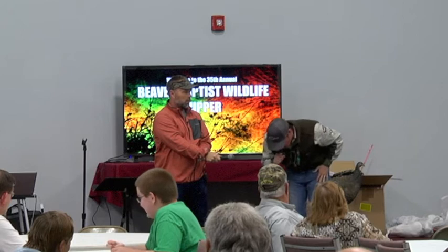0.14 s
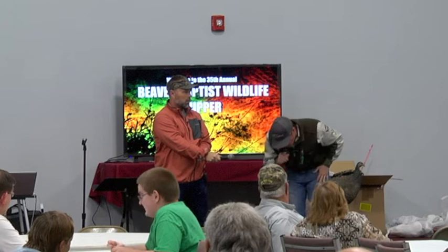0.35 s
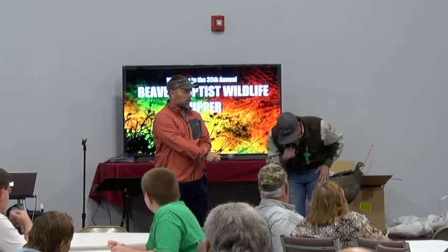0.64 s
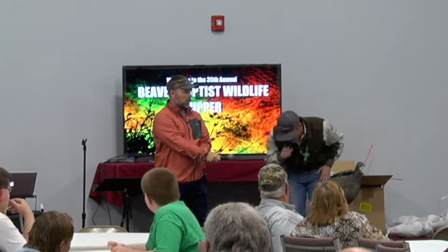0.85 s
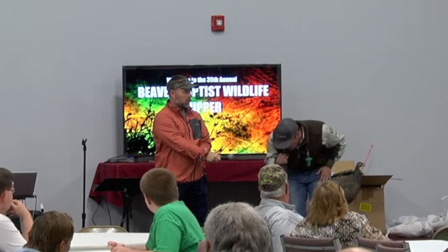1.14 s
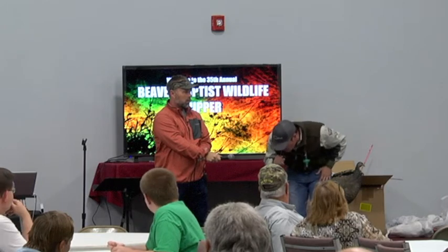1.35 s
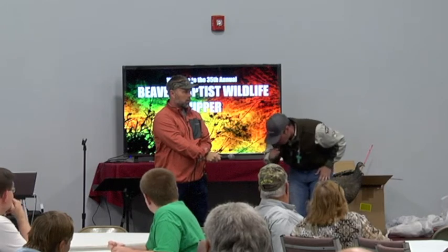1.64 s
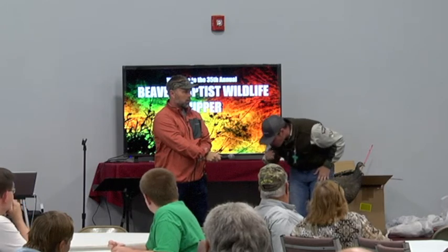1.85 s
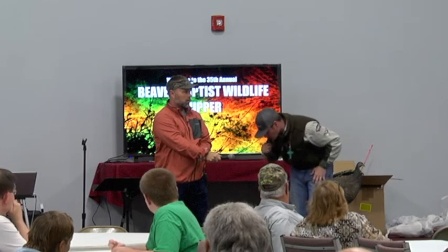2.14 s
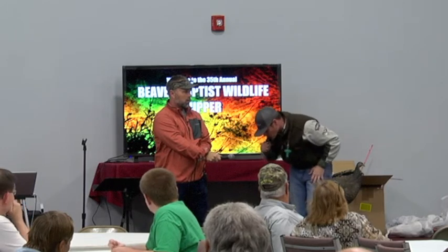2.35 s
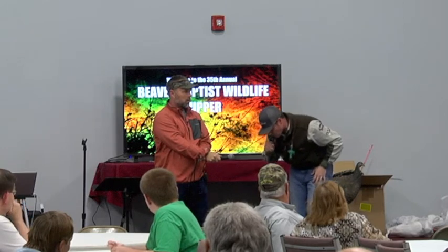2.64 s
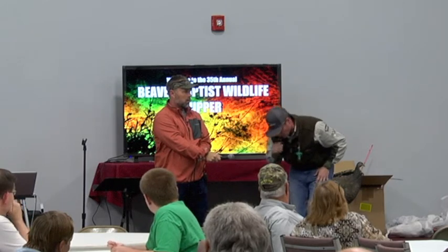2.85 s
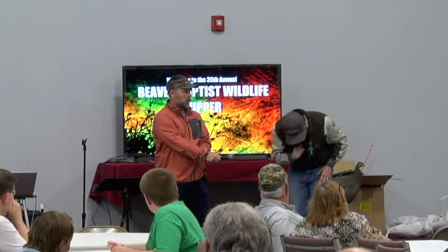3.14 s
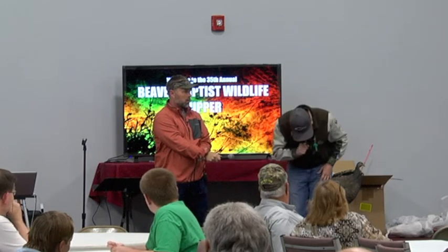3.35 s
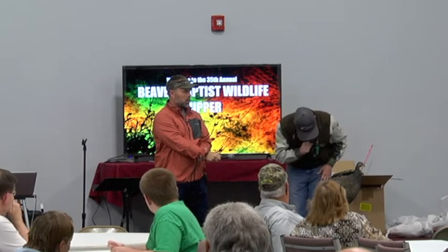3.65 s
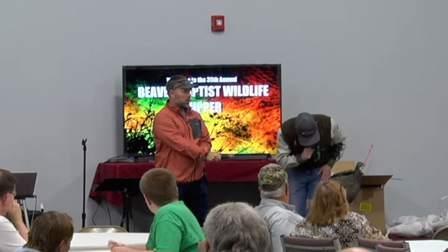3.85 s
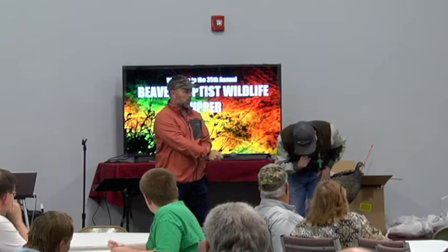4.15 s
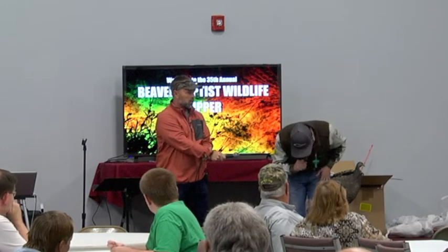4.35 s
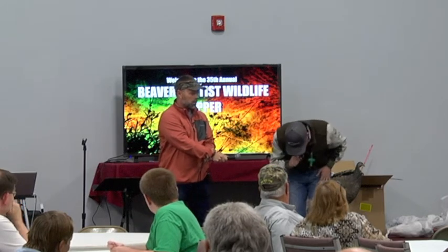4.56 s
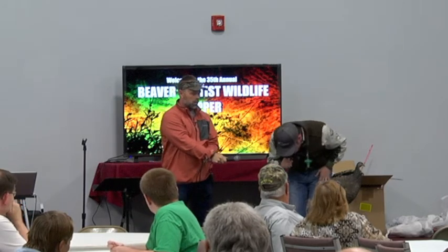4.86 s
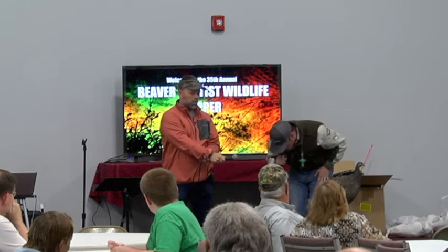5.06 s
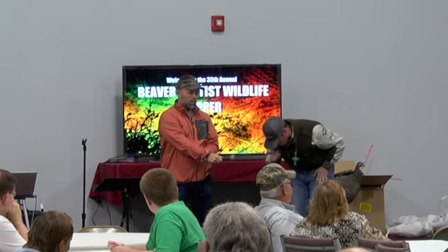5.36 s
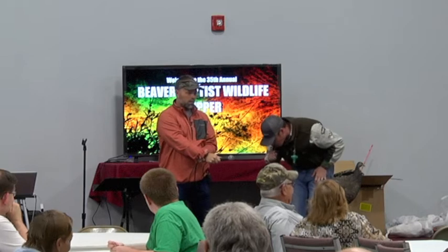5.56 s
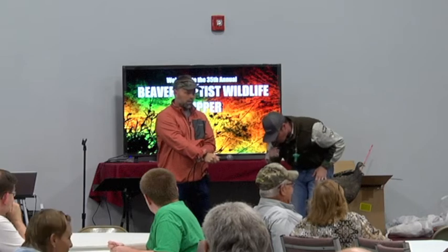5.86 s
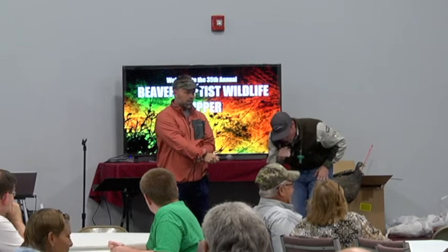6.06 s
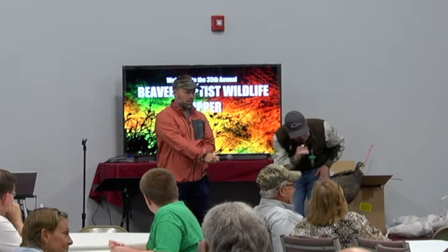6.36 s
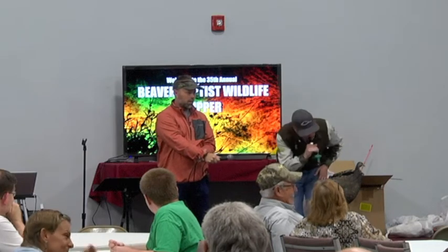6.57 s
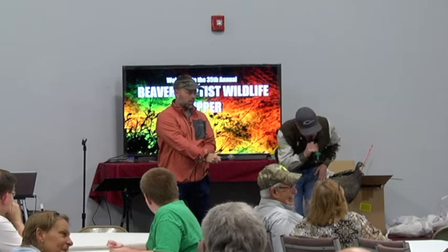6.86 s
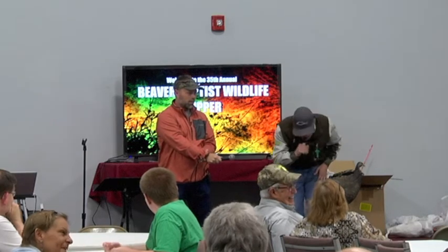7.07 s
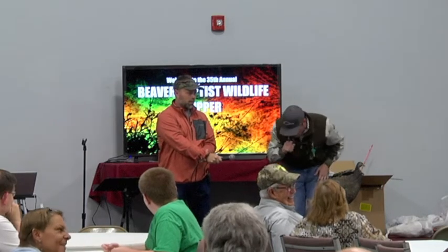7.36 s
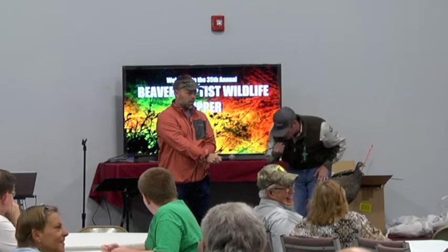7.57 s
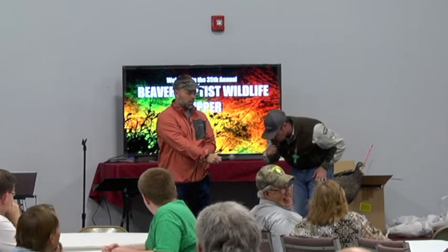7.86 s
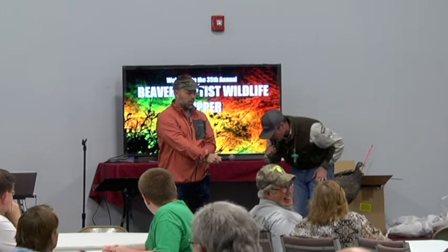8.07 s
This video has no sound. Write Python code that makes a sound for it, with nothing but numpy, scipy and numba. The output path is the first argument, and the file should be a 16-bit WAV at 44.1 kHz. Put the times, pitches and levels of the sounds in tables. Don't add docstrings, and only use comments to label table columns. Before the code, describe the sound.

A hand-held duck call blown close to a microphone in a hard, echoing hall: long raspy honks, then faster, louder honks alternating with short clucks.

```python
import sys
import numpy as np
from scipy import signal
from scipy.fft import rfft, irfft
from scipy.io import wavfile
from scipy.ndimage import uniform_filter1d
from numba import njit

SR = 44100
rng = np.random.default_rng(int(sys.argv[2]) if len(sys.argv) > 2 else 0)


def ratio_of_db(decibels):
    return 10 ** (np.asarray(decibels, float) / 20)


def store_wav(level_fs):
    pcm = np.round(np.clip(np.atleast_2d(level_fs), -1, 1) * 32767)
    wavfile.write(sys.argv[1], SR, pcm.T.astype(np.int16))


N = 361619


def rms_one(x):
    return x / np.sqrt(np.mean(x ** 2) + 1e-20)


def at_hz(points, hz, column=1):
    points = np.array(points)
    return np.interp(np.log(hz), np.log(points[:, 0]), points[:, column])


def resonance(x, hz, width_hz):
    r = np.exp(-np.pi * width_hz / SR)
    return signal.lfilter([(1 - r * r) / 2, 0, (r * r - 1) / 2], [1, -2 * r * np.cos(2 * np.pi * hz / SR), r * r], x)


@njit
def moving_resonance(x, cosine, r):
    y = np.zeros(len(x))
    for i in range(2, len(x)):
        drive = (1 - 2 * r * cosine[i] + r * r) * x[i]
        y[i] = drive + 2 * r * cosine[i] * y[i - 1] - r * r * y[i - 2]
    return y


def drift(hz):
    return rms_one(resonance(resonance(rng.standard_normal(N), hz, hz), hz, hz))


def blowing(attack_s=0.007, release_s=0.011, opening_s=0.02, closed=0.69, closing=0.1):
    # start in seconds, length in seconds, slaps per second at the start in Hz, held in Hz, at the end in Hz.
    honks = [(-0.1, 0.252, 420, 467.2, 442.3), (0.271, 0.212, 383.5, 451.3, 409.4),
             (0.607, 0.165, 384.9, 452.1, 385), (1.122, 0.493, 391.1, 469.3, 422.4),
             (1.779, 0.308, 347.3, 467.7, 403.8), (2.21, 0.246, 387.1, 446, 407),
             (2.591, 0.236, 378.8, 448, 403.4), (2.932, 0.136, 395, 449.4, 442.4),
             (3.175, 0.379, 328.8, 456, 410.9), (3.706, 0.298, 289.1, 412.8, 365.2),
             (4.125, 0.142, 388.1, 400.9, 431.6), (4.354, 0.236, 448.5, 621.2, 591.3),
             (4.748, 0.274, 470.4, 583.8, 515.6), (5.152, 0.254, 423.6, 587.9, 487),
             (5.536, 0.232, 415.9, 482.8, 416.6), (5.879, 0.14, 489.5, 487, 413.1),
             (6.108, 0.164, 418.5, 500, 596.6), (6.462, 0.142, 529.6, 473.5, 561.3),
             (6.803, 0.12, 598.1, 482.9, 530.3), (7.099, 0.12, 498.3, 478.6, 528.3),
             (7.407, 0.106, 449.2, 427.6, 494.7), (7.676, 0.076, 439.7, 407.6, 412.6),
             (7.898, 0.074, 367, 441.2, 425)]
    # level in dB, cupped-hand resonance in Hz, lowest partial in dB over the level,
    # unevenness of slap pairs (0-1), rasp (0-1).
    blows = [(-11.5, 1800, -21, .45, 1), (-11.5, 1830, -17.5, 0.7, 0.8), (-12.5, 1830, -17.5, .8, 0.1),
             (-11, 1828, -17.5, 0.5, 0.6), (-10.5, 1864, -14, .4, 1), (-11, 1854, -10.5, 0.38, 1),
             (-11.5, 1804, -11.5, 0.7, .8), (-12.5, 1806, -15, 0.33, 1.01), (-12, 1488, -15, 0.7, 0.3),
             (-11.5, 1518, -13, .6, 1), (-13, 1614, -12, 0.4, 0.5), (-9.5, 1983, -37.5, .05, 1),
             (-9.5, 1890, -34.5, .1, .05), (-10, 1780, -19, 0, 0.2), (-10, 1790, -12, .2, 0.96),
             (-10, 1740, -12, 0.4, 1), (-8, 1764, -15.5, .25, 1), (-7, 1880, -20, 0.2, 1.01),
             (-7, 1920, -20, .05, 0.5), (-7.5, 1980, -17.5, 0.22, 0.7), (-5, 1755, -19, 0.19, 0.2),
             (-9, 1880, -10.5, 0.2, 1.01), (-9, 1980, -12.5, 0.7, 1)]
    glides = [(.17, 0.0828), (.12, 0.22), (.12, .2), (.17, .1), (.15, .07), (.17, .1), (.2, .12),
              (0.19, 0.1058), (.14, .07), (.3, .12), (.1, 0.0797), (.2, 0.0503), (.13, .1), (.26, .1),
              (0.16, 0.082), (0.033, .25), (.25, .06), (0.17, .12), (.15, 0.12), (0.15, .12), (.17, .15),
              (.25, 0.078), (0.1, 0.3)]
    # start in seconds, length in seconds, held pitch in Hz, level in dB, lowest partial in dB over the level.
    clucks = [
        (4.604, 0.01, 720, -17.5, -18.5),
        (6.327, 0.032, 798.7, -10.5, -19),
        (6.67, 0.026, 935, -13.5, -13),
        (6.979, 0.032, 991.3, -14.5, -8),
        (7.289, 0.03, 938.5, -9, -25.5),
        (7.58, 0.026, 755.5, -10.5, -11.5),
        (7.804, 0.048, 691, -14.5, -3.5),
    ]
    droops = [.9, 1, 0.98, 0.92, 0.93, 0.96, .83]
    # centre in seconds, half length in seconds, pitch ratio.
    squeals = [
        (1.465, 0.045, 1.09),
        (5.699, 0.055, 1.1),
    ]
    cluck_start, cluck_cup_hz, cluck_uneven, cluck_rasp = 0.98, 1923, 0.093, 0.5
    cluck_rise, cluck_sag = 0.17, 0.1
    accent_db_per_octave, tiring_db = 5.5, -4
    catch_uneven, catch_s, end_uneven = 1, 0.019, 0.17
    bend_up, bend_down, bend_cluck = 1.45, 0.89, 0.68
    waver_hz, waver_pitch, waver_uneven, waver_db = 14, 0.013, 0.3, 0.8

    t = np.arange(N) / SR
    rows = [(*honk, *blow, *glide, 0) for honk, blow, glide in zip(honks, blows, glides)]
    for (s, length, hz, db, low_db), droop in zip(clucks, droops):
        rows.append((s, length, cluck_start * hz, hz, droop * hz,
                     db, cluck_cup_hz, low_db, cluck_uneven, cluck_rasp, cluck_rise, cluck_sag, 1))
    rows = np.array(sorted(rows))
    latest = np.maximum(np.searchsorted(rows[:, 0] - 2 * attack_s, t) - 1, 0)
    (start, length, first_hz, held_hz, last_hz,
     level_db, cup, low_db, uneven, rasp, rise, sag, cluck) = rows[latest].T
    since = t - start + attack_s
    left = start + length - t
    settling = np.exp(-np.maximum(t - start, 0) / (rise * length))
    leaving = np.exp(-np.maximum(left, 0) / (sag * length))

    jump, clean = 0, 0
    for s, half_s, ratio in squeals:
        jump = jump + np.exp(-((t - s) / half_s) ** 6) * (ratio - 1)
        clean = clean + np.exp(-((t - s) / half_s / 1.3) ** 4)
    uneven = uneven * (1 - clean)

    rate = held_hz + (first_hz - held_hz) * settling + (last_hz - held_hz) * leaving
    rate = rate * (1 + jump + waver_pitch * uneven * drift(waver_hz))
    bend_in, bend_out = [np.where(cluck, bend_cluck, np.where(hz > held_hz, bend_up, bend_down))
                         for hz in (first_hz, last_hz)]
    onset_bend = (bend_in - 1) * np.clip(1 - since / attack_s, 0, 1)
    end_bend = (bend_out - 1) * np.clip(-2 * left / release_s, 0, 1)
    rate = rate * (1 + onset_bend + end_bend)

    level_db = level_db + accent_db_per_octave * np.log2(first_hz / held_hz) * settling
    level_db = level_db + tiring_db * leaving + waver_db * drift(waver_hz)
    level_db = level_db + np.interp(since * (1 + 2 * cluck), [-attack_s, 0, 0.003, 2 * attack_s], [-59, -35, -5, 0])
    level_db = level_db + np.interp(-left, release_s * np.array([0, 0.5, 1, 2]), [0.5, -4, -19.5, -55])

    limp = catch_uneven * np.exp(-np.abs(since) / catch_s) + end_uneven * leaving
    uneven = uneven * (1 + waver_uneven * drift(waver_hz)) + limp * (1 - cluck)
    uneven = np.clip(1.396 * uneven - 0.1, 0, 1)

    rising = first_hz < held_hz
    cup = cup * (1 - rising * (1 - closed) * np.exp(-np.abs(since) / opening_s) - rising * closing * leaving)
    low_db = low_db - 12 * rising * (1 - cluck) * np.exp(-(since / catch_s) ** 2)
    rate, cup = uniform_filter1d(rate, size=200), uniform_filter1d(cup, size=300)
    return rate, level_db, uneven, low_db, cup, np.clip(rasp, 0, 1), since


def reed_slaps(cycles, uneven, rasp, since, shift=0.11, weak=0.42, catch_s=0.02):
    whole = np.arange(1, int(cycles[-1]) - 1)
    at = np.interp(whole, cycles, np.arange(N)).astype(int)
    chance = rng.standard_normal((5000, 2))[:len(whole)]
    second = whole % 2
    late = second * shift * uneven[at] + (0.004 + 0.035 * rasp[at] * uneven[at]) * chance[:, 0]
    size = 1 - second * uneven[at] * (weak + (1 - weak) * np.exp(-(since[at] / catch_s) ** 2))
    size = size * ratio_of_db((0.3 + 3 * rasp[at] * uneven[at]) * chance[:, 1])
    place = np.interp(whole + late, cycles, np.arange(N))
    index, clicks = place.astype(int), np.zeros(N + 1)
    np.add.at(clicks, index, size * (1 + index - place))
    np.add.at(clicks, index + 1, size * (place - index))
    return clicks[:N]


def call(lower=1.014, upper=1.384, body_db=12):
    # centre in Hz, width in Hz, level in dB.
    barrel = [(3150, 900, -32), (3980, 800, -25), (5250, 1200, -36.5), (7310, 690, -6)]
    # time in seconds, barrel ring in dB, extra on upper modes in dB.
    uncovered = [(0, -0.5, -8), (1, -7.5, -6), (1.702, 1.5, -5.5), (2.148, 0.5, -6), (2.701, 8.5, -18),
                 (3.098, -20.5, 5), (3.6, -7, -2.5), (4.3, -1, -8.5), (4.502, -8, 5.5), (5.002, -15.5, 11),
                 (5.498, -12, 5), (6.102, 6, -7), (6.601, -0.5, 2.5), (7.099, 5.5, -3.5), (7.598, 5.5, 0.5),
                 (8.2, -2, -6.5)]
    rate, level_db, uneven, low_db, cup, rasp, since = blowing()
    flutter = rms_one(resonance(rng.standard_normal(N), 34.9, 30))
    cycles = np.cumsum(rate * (1 + 0.016 * uneven * flutter)) / SR
    puffs = rng.standard_normal(N) * (1 + np.cos(2 * np.pi * cycles)) * (0.06 + uneven)
    slaps = reed_slaps(cycles, uneven, rasp, since)

    thin = signal.butter(1, 700, "high", fs=SR, output="sos")
    ring = signal.sosfilt(thin, slaps + ratio_of_db(-42) * puffs)
    upper_share = upper * np.minimum(cup / 1800, 1) ** 0.75 * np.minimum(1800 / cup, 1) ** 0.69
    for share, width_hz in ((lower, 330), (upper_share, 420)):
        ring = moving_resonance(ring, np.cos(2 * np.pi * share * cup / SR), np.exp(-np.pi * width_hz / SR))

    tube_db = body_db + 13 * np.exp(-np.abs(since) / 0.017)
    ring = ring + ratio_of_db(tube_db) * resonance(slaps, 720, 490)

    airy = 1.27 * slaps + ratio_of_db(-20.5) * puffs * (1 + 0.45 / (0.072 + uneven))
    s, barrel_db, upper_db = np.transpose(uncovered)
    for hz, width, db in barrel:
        open_db = np.interp(np.arange(N) / SR, s, barrel_db + upper_db * (hz > barrel[0][0]))
        open_db = open_db - 14 * np.exp(-np.abs(since) / 0.031)
        ring = ring + ratio_of_db(db + 27.5 + open_db) * resonance(resonance(airy, hz, width), hz, width)

    ring = ring / np.sqrt(uniform_filter1d(ring ** 2, size=900) + 1e-12)
    lowest = np.sqrt(2) * ratio_of_db(low_db + 3.0) * np.cos(2 * np.pi * cycles - 0.4)
    lowest = lowest * (1 + 0.49 * uneven * np.cos(np.pi * cycles))
    return ratio_of_db(level_db - 4.17) * (ring + lowest), level_db


def hall(x, delay_s=0.03):
    # frequency in Hz, time to decay 60 dB in seconds, level in dB.
    decay = [(150, 0.78, -0.5), (500, 3.08, -2), (1220, 2.03, 1.5), (1760, 6.3, -3.5), (2200, 4.2, 1.5),
             (3230, 1.8, 8.5), (4640, 4.76, 1), (8015, 0.32, 12)]
    t, edges, echo = np.arange(3 * SR) / SR, np.geomspace(100, 9000, num=12), 0
    white = rng.standard_normal((2, len(t)))
    for k, (low, high) in enumerate(zip(edges, edges[1:])):
        hz = np.sqrt(low * high)
        band = signal.sosfilt(signal.butter(2, [low, high], "band", fs=SR, output="sos"), white[k % 2])
        echo = echo + band * ratio_of_db(at_hz(decay, hz, column=2) - 60 * t / at_hz(decay, hz))
    echo = echo * np.clip(t / delay_s - 1, 0, 1)
    return rms_one(irfft(rfft(x) * rfft(echo, N), N))


def room_floor(floor_db=-51, stop_s=4.33, after_db=-16, air_after_db=-1.5):
    # frequency in Hz, ventilation level in dB per Hz.
    spectrum = [(25, 1), (60, -3.5), (140, -2), (220, -7), (400, 0), (1000, -16.5), (3000, -39.5),
                (7500, -57)]
    # hum frequency in Hz, level in dB rms.
    hum_lines = [(99.5, -56), (199, -62.5)]
    hz, t = np.arange(N // 2 + 1) * SR / N + 1, np.arange(N) / SR
    air = rms_one(irfft(rfft(rng.standard_normal(N)) * ratio_of_db(at_hz(spectrum, hz)), N))
    hum = sum(np.sqrt(2) * ratio_of_db(db) * np.sin(2 * np.pi * line_hz * t) for line_hz, db in hum_lines)
    off = np.clip((t - stop_s) / 0.18, 0, 1)
    return ratio_of_db(floor_db + air_after_db * off) * air + ratio_of_db(after_db * off) * hum


def gain_control(level_db):
    gain_db = 0
    for release_db_s, most_db in ((400, 11), (20, 8)):
        climb = release_db_s * np.arange(N) / SR
        held_db = np.maximum.accumulate(np.minimum(level_db, -19) + climb) - climb
        gain_db = gain_db + np.clip(-11 - held_db, 0, most_db)
    return ratio_of_db(uniform_filter1d(gain_db, size=300))


def reed_swings(fade_s=0.007, fall=0.1, lead_s=0.02):
    # time in seconds, peak level in dB, frequency in Hz, build-up in seconds.
    swings = [(0.261, -29, 169, 0.022), (0.589, -24, 186.4, 0.018), (1.115, -25.5, 237, 0.0047),
              (1.757, -16.5, 185.6, 0.017), (2.198, -24.5, 159, 0.022), (2.581, -24.5, 170.7, 0.034),
              (2.927, -23.5, 181.4, 0.019), (3.166, -16, 194.5, 0.011), (3.694, -22, 188.8, 0.025),
              (4.12, -20.5, 167.6, 0.0069), (4.352, -17.5, 209.7, 0.0099), (4.728, -27, 176, 0.017),
              (5.142, -24.5, 180, 0.019), (5.521, -23.5, 174, 0.016), (5.867, -31, 201.6, 0.025),
              (6.099, -18, 200, 0.013), (6.428, -16.5, 218, 0.031), (6.774, -18.5, 206.6, 0.023),
              (7.077, -19.5, 200, 0.0097), (7.374, -20, 216.5, 0.015), (7.626, -19.5, 199, 0.026),
              (7.881, -20.5, 184.5, 0.025), (8.098, -30, 192.5, 0.02)]
    out = np.zeros(N)
    t = np.arange(-lead_s, 0.09, 1 / SR)
    for s, db, hz, build_s in swings:
        shape = np.exp(-((t - build_s) / np.where(t < build_s, build_s + 0.0047, fade_s)) ** 2)
        phase = 2 * np.pi * np.cumsum(hz * (1 - fall * t / 0.019)) / SR
        start = round((s - lead_s) * SR)
        out[start:start + len(t)] += ratio_of_db(db) * shape * (np.sin(phase) + 0.38 * np.cos(2 * phase))
    return out


def scene():
    notes, level_db = call()
    near = notes + reed_swings()
    echo = ratio_of_db(-10 - 33) * hall(np.tanh(near / 0.85))
    background = echo + ratio_of_db(-6.5) * room_floor()
    return (near + gain_control(level_db) * background)[None]


def low_pass(x):
    return signal.sosfilt(signal.butter(12, 8070, fs=SR, output="sos"), x)


def record(dry):
    soft = 0.62 * np.tanh(dry / 0.55)
    top_cut = signal.cheby2(10, 60, 7763, fs=SR, output="sos")
    return low_pass(signal.sosfilt(top_cut, soft))


dry = scene()
out = record(dry)
store_wav(out)
```